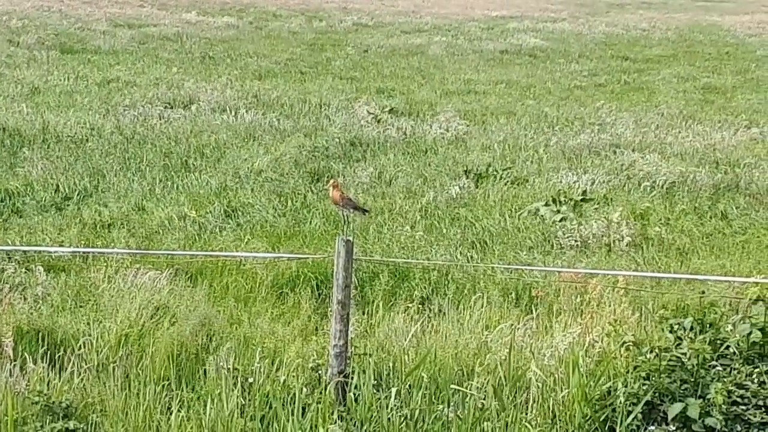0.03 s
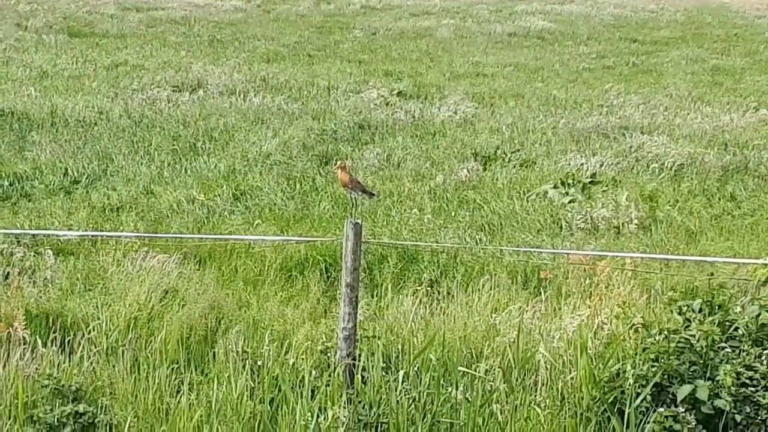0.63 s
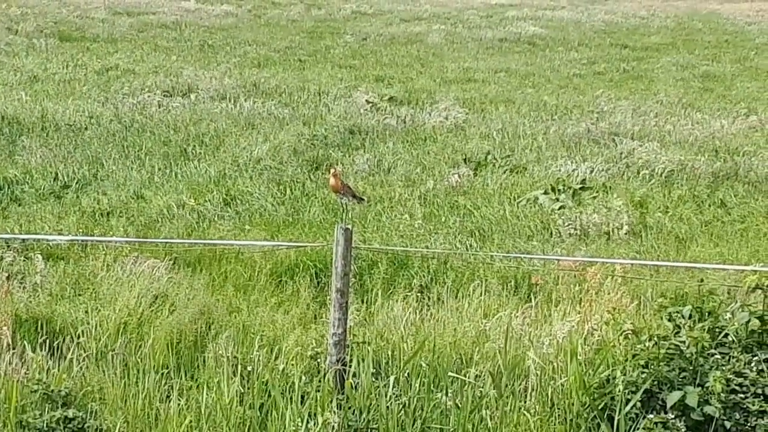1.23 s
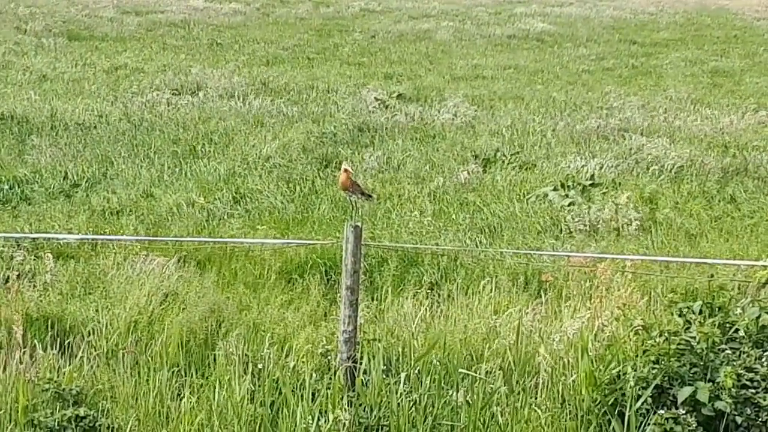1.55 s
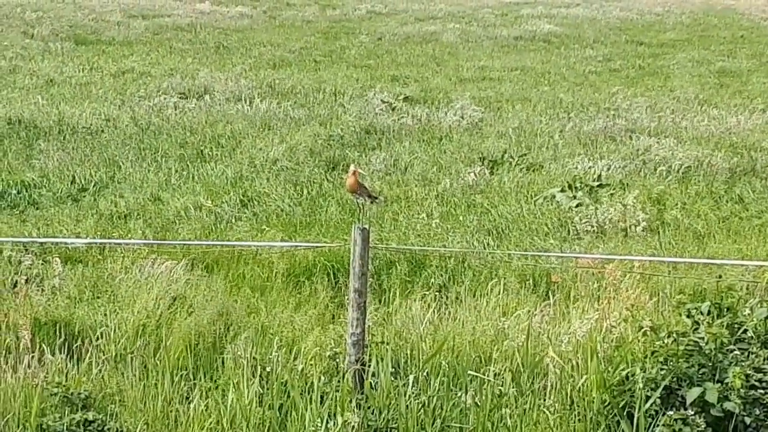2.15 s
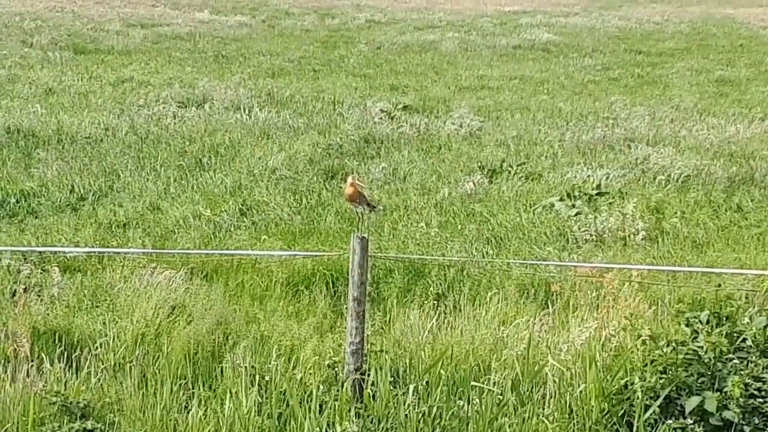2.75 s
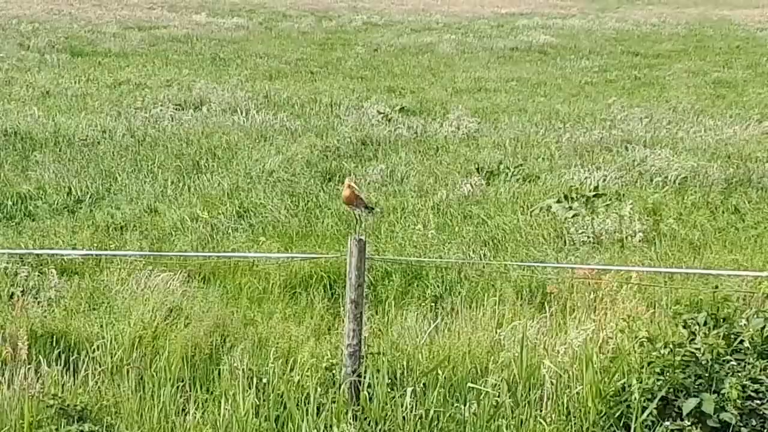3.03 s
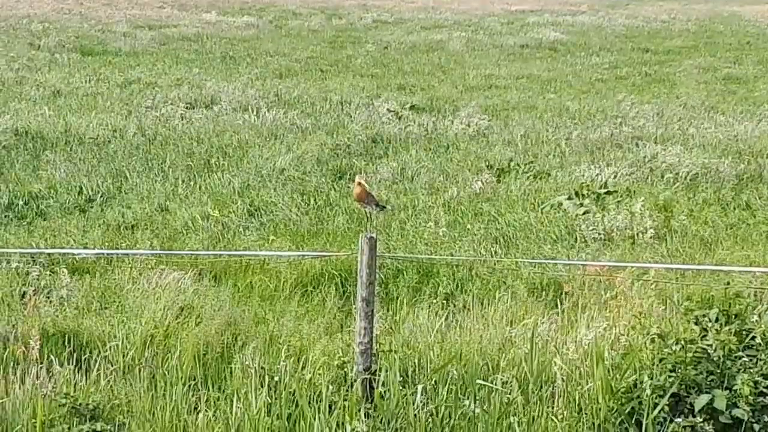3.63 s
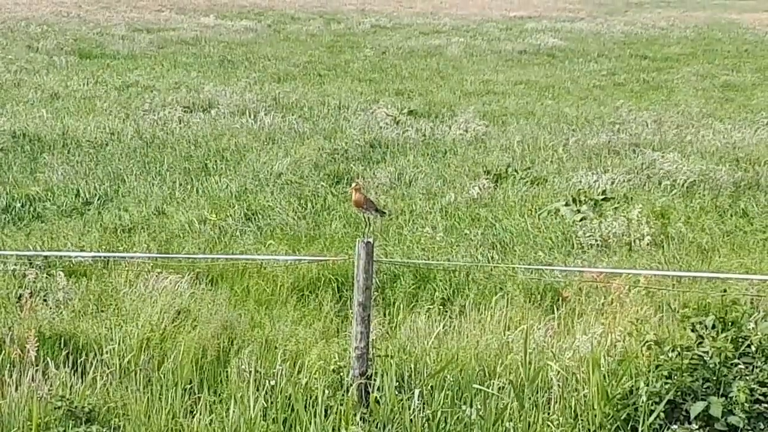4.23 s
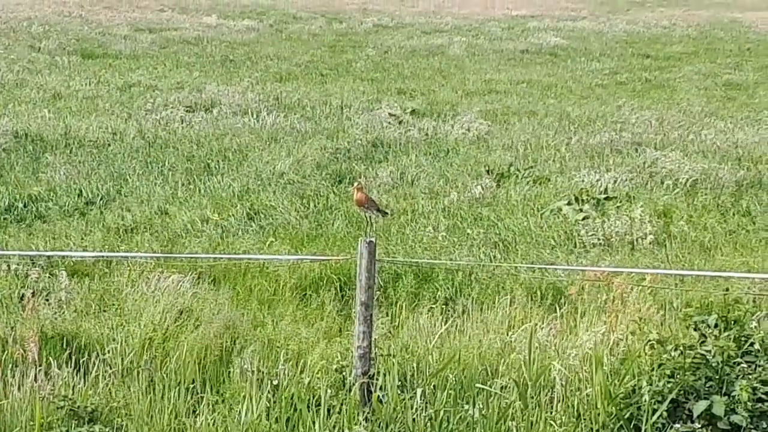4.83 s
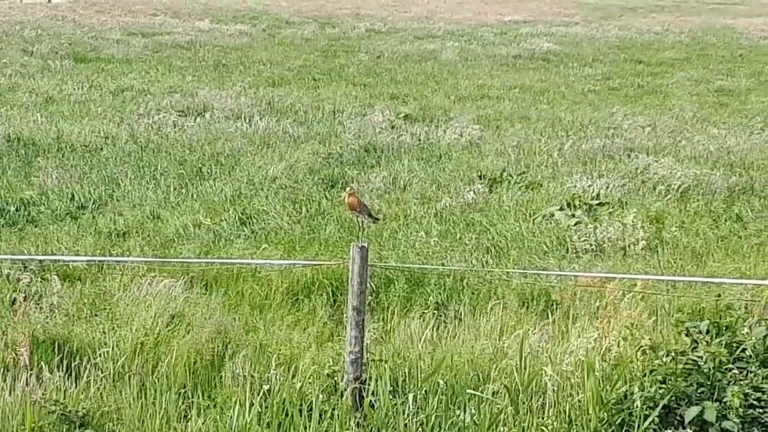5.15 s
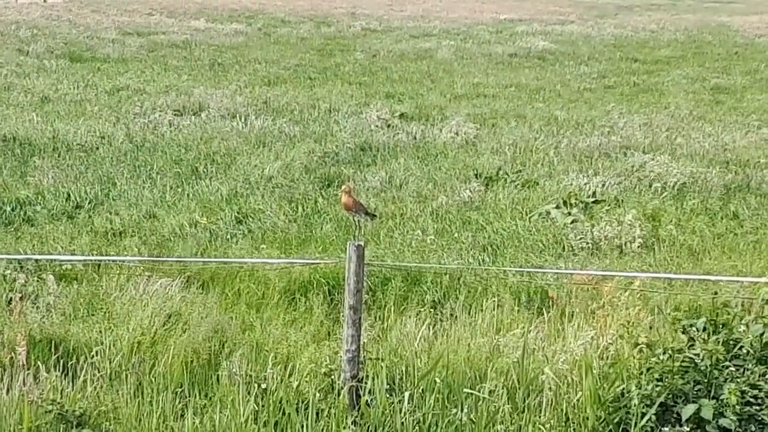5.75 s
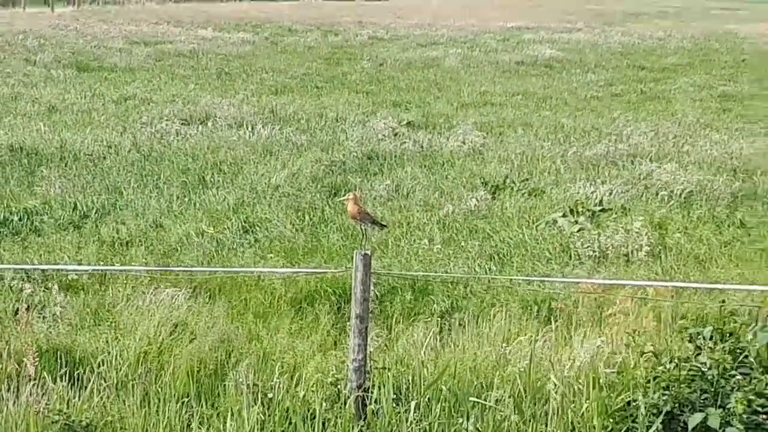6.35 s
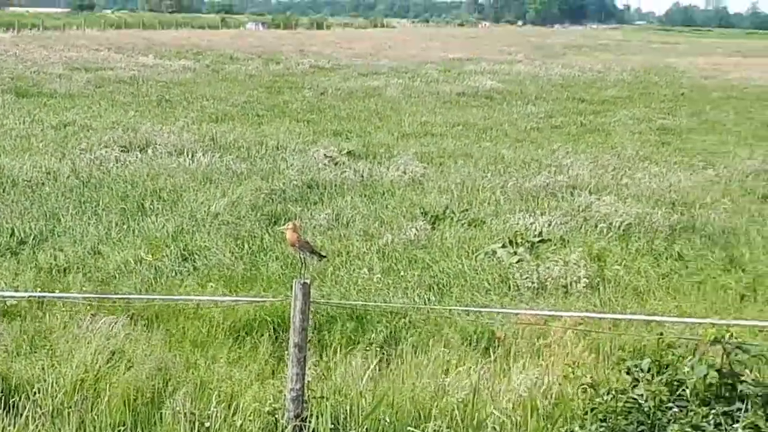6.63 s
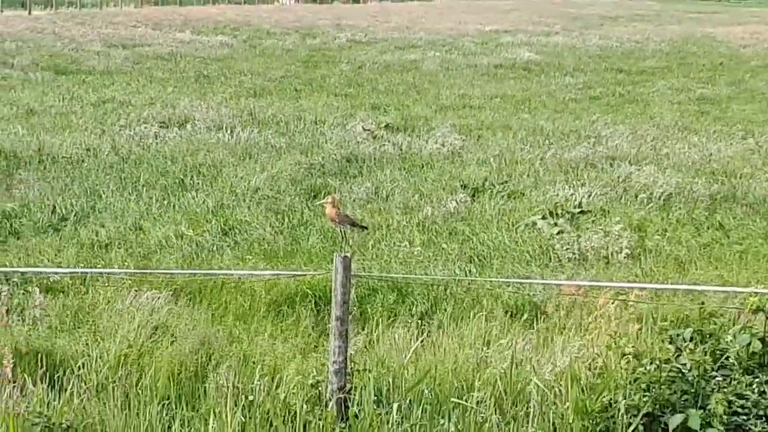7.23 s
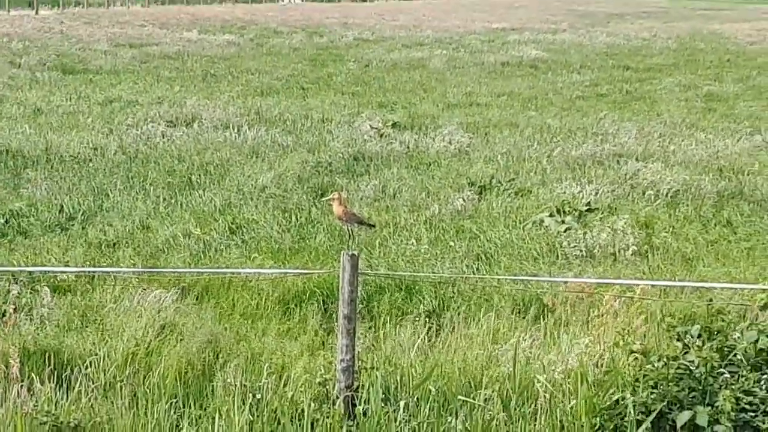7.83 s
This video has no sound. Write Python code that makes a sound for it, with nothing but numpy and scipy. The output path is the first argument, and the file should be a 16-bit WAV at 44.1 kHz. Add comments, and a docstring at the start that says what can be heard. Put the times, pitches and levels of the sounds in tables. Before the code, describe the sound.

A wading bird in an open meadow gives six sharp, nasal cries, about one and a half seconds apart, each arching up, sagging and ending in a rasp. Small birds chirp, whistle and trill faintly in between. Light wind rumbles on the microphone, gusts once with a low thud just before the fifth cry, then drops away. A few soft handling bumps are heard.

```python
"""Wader calling over a meadow

A wader on a fence post gives six sharp, nasal cries that arch up, sag and end in a rasp: the harmonics
of its syrinx sweep through the resonances of throat and bill. Small birds chirp, whistle and trill in
between. Light wind rumbles on the microphone, gusts once and drops. The hand-held camera is bumped a
few times, and its uneven sampling adds faint side tones to every bird."""
import sys
import numpy as np
from scipy import signal
from scipy.fft import rfft, irfft, next_fast_len
from scipy.io import wavfile
from scipy.ndimage import uniform_filter1d, map_coordinates

SR = 44100
rng = np.random.default_rng(int(sys.argv[2]) if len(sys.argv) > 2 else 0)


def digitize_waveform(pressure):
    """Quantize a signal to 16-bit integers and store it at the path in sys.argv[1].

    Rows of a 2-D input are taken as channels; values are limited to [-1, 1].
    """
    field = np.atleast_2d(pressure).T
    bounded = np.clip(field, -1, 1)
    quanta = np.round(bounded * 32767).astype(np.int16)
    wavfile.write(sys.argv[1], SR, quanta)


N = 347949

# rides of the meadow's hush and of the wind on the microphone: (time [s], relative level [dB])
HUSH_LEVEL = [(0.0, -76.5), (3.34, -77.5), (5.8, -73.5), (7.89, -76)]
BUFFET_LEVEL = [(0, -51), (.65, -59), (3, -59.5), (3.5, -63), (3.95, -55.5), (4.8, -56.5), (5.15, -43),
                (5.26, -39.5), (5.42, -55.5), (5.72, -67.5), (5.88, -73.5), (6.75, -75.5), (7, -70),
                (7.4, -72.5), (7.88, -77.5)]
# tone colours of the hush, the buffeting and the camera body: (frequency [Hz], gain [dB])
HUSH_SPECTRUM = [(150, -33.5), (250, -9), (526, -5.5), (600, -11), (652, -7.5), (864, -6.5), (2570, -17),
                 (3760, -19.5), (4660, -22.5), (13000, -32)]
BUFFET_SPECTRUM = [(12, -48), (20, -14), (75, 3.5), (135, -2), (225, -11), (255, -17.5), (340, -23.5),
                   (370, -29), (600, -37.5), (780, -85.5), (1320, -120)]
BODY_SPECTRUM = [(30, -9.5), (150, -8.5), (400, 0), (850, -5), (1400, -31), (4000, -22.5), (13000, -34)]
# knocks on the camera: (time [s], level [dB])
KNOCKS = [(2.829, -50), (3.928, -50), (6.868, -61), (6.942, -49), (6.989, -48.5), (7.151, -43.5),
          (7.199, -47.5), (7.368, -65)]
# tail scattered by the grass: (frequency [Hz], time to fall 60 dB [s])
GRASS_DECAY = [(500, .13), (3000, 0.17), (12000, 0.03)]

# two-part calls, a high falling slide and a lower rising hook: (time [s], relative level [dB])
SLIDE_CALLS = [(.44, -79.5), (1.978, -83.5), (3.27, -70.5), (6.985, -79.5), (7.545, -76)]
# pitch bends of those two parts: (time into the note [s], pitch [Hz])
SLIDE_BEND = [(0, 6600), (.035, 5600), (.08, 5050)]
HOOK_BEND = [(0, 4150), (.035, 4464), (.075, 4650)]
# buzzy slurs and quick downward flicks:
# (time [s], length [s], first pitch [Hz], last pitch [Hz], relative level [dB])
BUZZ_NOTES = [(2.069, 0.068, 6300, 4500, -75), (2.635, 0.054, 4840, 3850, -72),
              (2.72, 0.069, 4460, 3370, -65.5), (2.78, .06, 7600, 4600, -73),
              (3.783, .11, 3810, 3960, -60.5), (4.545, .076, 6620, 4030, -67.5),
              (5.209, 0.078, 4780, 3880, -65.5), (5.3, 0.047, 4650, 3580, -66),
              (5.412, 0.032, 3990, 4050, -64), (6.759, 0.037, 4640, 3800, -76.5)]
FLICK_NOTES = [(2.198, 0.019, 4100, 3550, -77), (5.257, 0.037, 4300, 3570, -57),
               (5.425, 0.042, 4150, 3570, -54.5), (6.532, 0.028, 4570, 3870, -74.5),
               (6.631, 0.0326, 4640, 3820, -77.5), (7.462, .027, 4250, 3050, -70.5),
               (7.557, 0.0079, 3100, 2700, -68.5)]
# short rising pips: (time [s], length [s], centre pitch [Hz], relative level [dB])
PIP_NOTES = [(2.103, .036, 2830, -70.5), (2.652, 0.055, 3343, -58.5), (7.654, 0.0237, 2930, -69.5),
             (7.732, 0.023, 2800, -72.5), (7.811, 0.016, 2933, -65.5)]
# glides of two clear whistles and a far nasal call: (time [s], pitch [Hz], relative level [dB])
HIGH_GLIDE = [(3.872, 4850, -70), (3.884, 6000, -50), (3.932, 5810, -51.5), (3.946, 7100, -70),
              (3.963, 5460, -54)]
LOW_GLIDE = [(6.25, 2980, -63), (6.279, 3160, -48), (6.287, 3200, -75), (6.3, 3350, -46),
             (6.322, 3300, -61), (6.338, 2750, -65), (6.365, 2480, -57), (6.42, 2380, -70),
             (6.47, 2480, -67)]
NASAL_GLIDE = [(2.283, 470, -69), (2.303, 392, -68), (2.335, 364.8, -57), (2.38, 349.8, -58),
               (2.46, 342.4, -58.5), (2.55, 337.5, -62.5), (2.578, 330.4, -76)]
# overtones of the nasal call: (harmonic [number], relative level [dB])
NASAL_HARMONICS = [(3, -29), (4, -19.5), (7, -4), (8, 2.5), (9, -24), (14, -6), (15, 1.5), (16, 0.5),
                   (17, -20.5)]
# colour that the caller's bill gives them: (frequency [Hz], gain [dB])
BILL_SPECTRUM = [(3200, -2), (4200, 0), (5000, 2.5), (5600, -2), (6300, -13), (7500, -14)]
# runs of chips: (time [s], length [s], chip rate [1/s], first pitch [Hz], last pitch [Hz],
# sweep per chip [share of pitch], relative level [dB])
TRILL_RUNS = [(2.85, .25, 55, 3800, 3100, .22, -45.5), (5.807, .41, 53.7, 3350, 2900, -.24, -59.5),
              (5.845, .37, 53.7, 4300, 4400, -.22, -69.5), (6.796, .285, 36.6, 2650, 2740, .17, -54.5)]

# resonances of the wader's throat and bill: (frequency [Hz], gain [dB])
THROAT_SPECTRUM = [(750, -17), (1150, -5.5), (1380, -10), (1580, -2), (2200, 0.5), (2950, -0.5),
                   (3400, 1.5), (4300, -1.5), (5000, -10), (6100, -11.5), (7000, -22.5), (8000, -17.5),
                   (9000, -35), (13000, -34)]
# bands where the ground bounce cancels the direct sound: (centre [Hz], width [Hz], depth [dB])
GROUND_NOTCHES = [(1296.6, 39, 17), (2436, 75, 13.5), (2662, 27, 14), (4059, 42, 5), (4492, 94, 8.5)]
# the wader's cries: (time [s], rasp after [s], break after [s], first pitch [Hz], top pitch [Hz],
# rise [s], arch width [s], sag [Hz], level [dB], fade [dB/s], rasp [0-1], brightness [dB/octave])
WADER_CRIES = [(.053, .265, 0.29, 1186, 1517, .051, .034, 95.7, -28, 45.5, 0.6, -.5),
               (1.343, .22, 0.23, 1174, 1572, .063, 0.029, 102.9, -25.5, 83, .25, 0.43),
               (2.836, .183, .225, 1265, 1549, .053, 0.086, 237, -24.5, 99.5, .15, -2.06),
               (4.245, .203, 0.21, 1188, 1583, .054, .0443, 126, -25, 66, .25, 0.6),
               (5.515, .22, 0.28, 1137, 1498, .0595, .028, 90.3, -27.5, 75.5, .65, 0),
               (7.07, .22, 0.25, 1162, 1513, .047, .036, 112.9, -29.5, 77.5, 0.9, -1.65)]

ATTACK_S, ATTACK_DB, FADE_FROM_S = .034, 20.5, .11  # a cry swells in, holds, then fades
BREAK_S, BREAK_HZ_PER_S, BREAK_DB_PER_S = .049, 8000, 345  # the collapse that ends it


def amp(db):
    """Decibels to gain."""
    return 10 ** (np.asarray(db) / 20)


def lean_left(db):
    """Stereo gains: left up by db, right down by db."""
    return amp([[db], [-db]])


def unit(x):
    """Scale to rms 1."""
    return x / np.sqrt(np.mean(x ** 2) + 1e-20)


def along(points, hz):
    """Read (frequency, value) points on a log frequency axis."""
    f, v = np.transpose(points)
    return np.interp(np.log(hz + 1), np.log(f + 1), v)


def curves(rows, t):
    """Each column after the first, read at the times t."""
    s, *cols = np.transpose(rows)
    return [np.interp(t, s, c) for c in cols]


def wobble(rate, size):
    """A smooth random curve with rate knots a second."""
    knots = rng.standard_normal(4096)
    return map_coordinates(knots, [np.arange(size) * rate / SR], mode="mirror")


def phase_of(pitch):
    """Running phase of an oscillator that follows a pitch curve."""
    return 2 * np.pi * np.cumsum(pitch) / SR


def filtered(x, response):
    """Shape x with a frequency response."""
    m = next_fast_len(x.shape[-1] + 8192)
    return irfft(rfft(x, m) * response(np.fft.rfftfreq(m, 1 / SR)), m)[..., :x.shape[-1]]


def noise(spectrum, size):
    """Coloured noise of rms 1."""
    return unit(filtered(rng.standard_normal(size), lambda hz: amp(along(spectrum, hz))))


def gate(t, start, end, edge):
    """1 between start and end, with soft edges inside."""
    return np.sin(np.pi / 2 * np.clip(np.minimum(t - start, end - t) / edge, 0, 1)) ** 2


def add(track, s, sound):
    """Mix a sound into the track at time s."""
    part = track[max(round(s * SR), 0):][:len(sound)]
    part += sound[:len(part)]


def wind(lumps_db=2.5, side_db=-18):
    """The bed: lumpy buffeting on the microphone over the even hush of the meadow."""
    t = np.arange(N) / SR
    buffet_db, = curves(BUFFET_LEVEL, t)
    hush_db, = curves(HUSH_LEVEL, t)
    mid = unit(noise(BUFFET_SPECTRUM, N) * amp(lumps_db * wobble(22, N)))
    side = amp(side_db) * noise(BUFFET_SPECTRUM, N)
    buffet = np.array([mid + side, mid - side]) * lean_left(.9)
    return amp(buffet_db - 1) * buffet + amp(hush_db + 3) * noise(HUSH_SPECTRUM, N)


def gust_thud(s=5.196, length=.045, start_hz=200, end_hz=75, level_db=-28):
    """The heart of the gust strikes the microphone with one low, sinking thud."""
    track, t = np.zeros(N), np.arange(SR // 10) / SR
    pitch = np.interp(t, [0, length], [start_hz, end_hz]) * (1 + .3 * wobble(350, len(t)))
    add(track, s, amp(level_db) * gate(t, 0, length, .008) * np.sin(phase_of(pitch)))
    return track * lean_left(1.3)


def camera_bumps(attack_s=.00052, t60=.04):
    """Dull, short knocks of the hand on the camera body."""
    track, t = np.zeros(N), np.arange(SR // 10) / SR
    for s, db in KNOCKS:
        envelope = amp(db - 60 * t / t60) * (1 - np.exp(-t / attack_s))
        add(track, s, envelope * noise(BODY_SPECTRUM, len(t)))
    return track


def grass_scatter(x, spread=.11):
    """The short tail that grass and fence scatter back, a little different on each side."""
    hz, t, bands = signal.stft(rng.standard_normal((2, SR // 3)), SR, nperseg=256)
    decay = amp(-60 * t / along(GRASS_DECAY, hz)[:, None])
    mid, side = signal.istft(bands * decay, SR, nperseg=256)[1]
    tail = np.array([mid + spread * side, mid - spread * side])
    return signal.fftconvolve(x[None], tail / np.linalg.norm(tail[0]), axes=1)[:, :N]


def nasal_call(glide, jitter=.003, rough=.15):
    """A buzzing, slightly hoarse voice with two clusters of harmonics scoops down to a held pitch."""
    t = np.arange(glide[0][0], glide[-1][0], 1 / SR)
    pitch, db = curves(glide, t)
    phase = phase_of(pitch * (1 + jitter * wobble(300, len(t))))
    tone = np.zeros(len(t))
    for k, harmonic_db in NASAL_HARMONICS:
        gain = amp(harmonic_db + along(BILL_SPECTRUM, k * pitch))
        tone += gain * np.sin(k * phase + rng.uniform(0, 2 * np.pi))
    hoarse = unit(tone * (1 + rough * wobble(3500, len(t))))
    return amp(db + 3) * hoarse * gate(t, t[0], t[-1], .01)


def chirp(bend, db, warble_hz, depth):
    """A short note that follows a pitch bend and warbles by depth, a share of its pitch."""
    t = np.arange(SR // 6) / SR
    pitch, = curves(bend, t)
    warble = depth * np.sin(2 * np.pi * warble_hz * t + .9 * wobble(80, len(t)))
    pitch = pitch * (1 + warble + .006 * wobble(400, len(t)))
    return amp(db + 7.5) * gate(t / bend[-1][0], 0, 1, .28) * np.sin(phase_of(pitch))


def whistle(glide, waver=.004):
    """A clear, gliding tone."""
    t = np.arange(glide[0][0], glide[-1][0], 1 / SR)
    pitch, db = curves(glide, t)
    phase = phase_of(pitch * (1 + waver * wobble(300, len(t))))
    return amp(db + 2) * gate(t, t[0], t[-1], .0055) * np.sin(phase)


def songbirds(hook_after_s=.057, pip_rise_hz=140):
    """The small birds of the meadow; fainter notes sit farther off, with more scatter from the grass."""
    notes = []  # (time [s], relative level [dB], sound)
    for s, db in SLIDE_CALLS:
        notes.append((s, db, chirp(SLIDE_BEND, db, warble_hz=90, depth=.043)))
        notes.append((s + hook_after_s, db, chirp(HOOK_BEND, db + 1, warble_hz=90, depth=.043)))
    for s, length, first, last, db in BUZZ_NOTES:
        notes.append((s, db, chirp([(0, first), (length, last)], db, warble_hz=68, depth=.085)))
    for s, length, first, last, db in FLICK_NOTES:
        bend = [(0, first), (length / 2, first + .81 * (last - first)), (length, last)]  # steep at first
        notes.append((s, db, chirp(bend, db, warble_hz=68, depth=.0047)))
    for s, length, hz, db in PIP_NOTES:
        bend = [(0, hz - pip_rise_hz / 2), (length, hz + pip_rise_hz / 2)]
        notes.append((s, db, chirp(bend, db, warble_hz=240, depth=.07)))
    for glide, voice in [(HIGH_GLIDE, whistle), (LOW_GLIDE, whistle), (NASAL_GLIDE, nasal_call)]:
        peak_db = max(db for _, _, db in glide)
        notes.append((glide[0][0], peak_db, voice(glide)))
    direct, send = np.zeros(N), np.zeros(N)
    for s, db, sound in notes:
        wet = np.interp(db, [-68, -55], [.35, .03])  # share of the power that is scattered
        add(direct, s, np.sqrt(1 - wet) * sound)
        add(send, s, np.sqrt(wet) * sound)
    return direct + grass_scatter(send)


def trills(duty=.71):
    """Fast runs of short chips, each chip a small sweep; every run fades in and out."""
    track, t = np.zeros(N), np.arange(SR // 2) / SR
    for s, length, rate, first, last, sweep, db in TRILL_RUNS:
        in_chip = (t * rate) % 1
        waver = .02 * wobble(400, len(t))
        pitch = np.interp(t, [0, length], [first, last]) * (1 + sweep * (in_chip - .5) + waver)
        chips = gate(in_chip, .5 - duty / 2, .5 + duty / 2, .06)
        envelope = amp(db + 4.5) * chips * gate(t, 0, length, .081)
        add(track, s, envelope * np.sin(phase_of(pitch)))
    return track


def throat_tone(pitch, phase, bright_db, flutter_db=1.76):
    """The syrinx's harmonics, coloured by the wader's throat and notched by the ground bounce."""
    order = np.arange(1, 13)[:, None]
    hz = order * pitch
    slack = np.clip((1150 - pitch) / 250, 0, 1)  # the collapsing voice loses its overtones
    gains = amp(along(THROAT_SPECTRUM, hz) + (bright_db - 5 * slack) * np.log2(order))
    gains /= np.sqrt(np.sum(gains ** 2, axis=0) / 2)
    dips_db = sum(depth * np.exp(-((hz - centre) / width) ** 2)
                  for centre, width, depth in GROUND_NOTCHES)
    flutter = flutter_db * np.array([wobble(140, len(pitch)) for _ in order])
    return np.sum(gains * amp(flutter - dips_db) * np.sin(order * phase), axis=0)


def cry(rasp_s, hold_s, first_hz, top_hz, rise_s, arch_s, sag_hz, level_db, fade_db_per_s, rough,
        bright_db, lowest_hz=1121, rasp_onset_s=.023, shimmer_db=1.41):
    """One cry: the syrinx sweeps through the fixed throat, then turns chaotic as the pressure falls."""
    size = SR // 2
    t = np.arange(size) / SR
    # the pitch arches up, sags toward the lowest the voice can hold, then breaks
    rise = first_hz + (top_hz - first_hz) * np.sin(np.pi / 2 * np.clip(t / rise_s, 0, 1)) ** 1.5
    sag = np.maximum(top_hz - sag_hz * np.log1p(((t - rise_s) / arch_s) ** 2), lowest_hz)
    broken_s = np.clip(t - hold_s, 0, BREAK_S)
    pitch = np.where(t < rise_s, rise, sag) - BREAK_HZ_PER_S * broken_s
    db = level_db - ATTACK_DB * np.clip(1 - t / ATTACK_S, 0, 1) ** 1.6
    db -= fade_db_per_s * np.maximum(t - FADE_FROM_S, 0) + BREAK_DB_PER_S * broken_s
    # strained and hoarse on the high arch, pure on the way down, raspy at the end
    strain = np.clip((pitch - 1310) / 150, 0, 1)
    collapse = broken_s / BREAK_S
    rasp = rough * np.clip((t - rasp_s) / rasp_onset_s, 0, 1) * (1 - .75 * collapse) + .2 * collapse
    jitter = (.0013 + .0024 * strain) * wobble(450, size) + .043 * rasp * wobble(900, size)
    pitch = uniform_filter1d(pitch, size=200) * (1 + jitter)
    phase = phase_of(pitch)
    tone = throat_tone(pitch, phase, bright_db)
    # turbulent air leaves in one puff a cycle
    puffs = unit(noise(THROAT_SPECTRUM, size) * (1 + np.cos(phase)))
    breath = (amp(-46) + amp(-30) * strain + amp(-6) * rasp) * puffs
    # in the rasp, strong and weak cycles alternate irregularly
    doubling = np.sin(phase / 2 + 1.1 * wobble(150, size))
    voice = tone * (1 + rasp * (.2 * doubling + .46 * wobble(1100, size))) + breath
    return voice * amp(db + shimmer_db * wobble(70, size)) * gate(t, 0, hold_s + BREAK_S, .003)


def wader():
    """The lead voice: six cries from the fence post."""
    track = np.zeros(N)
    for s, *shape in WADER_CRIES:
        add(track, s, cry(*shape))
    return track


def scene(scatter_db=-15, hiss_db=-79):
    """The mix: birds and bumps sit near the centre; scatter, wind and microphone hiss give width."""
    near = wader() + trills()
    birds = near + amp(scatter_db) * grass_scatter(near) + songbirds()
    hiss = amp(hiss_db) * rng.standard_normal((2, N))
    return (birds + camera_bumps()) * lean_left(.15) + wind() + gust_thud() + hiss


def record(dry, slip_hz=3898, clock_hz=48000, top_hz=13050):
    """The camera drops samples steadily: its timing saws, adding side tones; the top end is cut off."""
    t = np.arange(N) / SR
    saw = sum(np.sin(2 * np.pi * k * slip_hz * t) / (np.pi * k) for k in range(1, 5))
    slope = filtered(dry, lambda hz: 2j * np.pi * hz * (hz < top_hz))
    side_tones = saw / clock_hz * slope  # timing error times the waveform's slope
    return filtered(dry + side_tones, lambda hz: hz < top_hz)


dry = scene()
out = record(dry)
digitize_waveform(out)
```